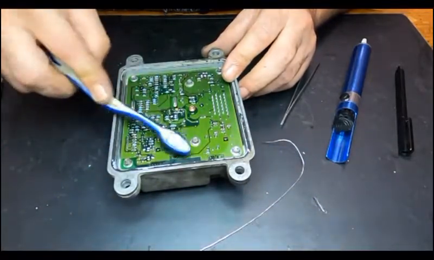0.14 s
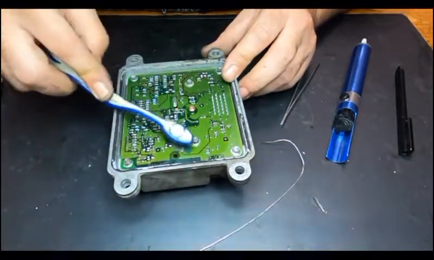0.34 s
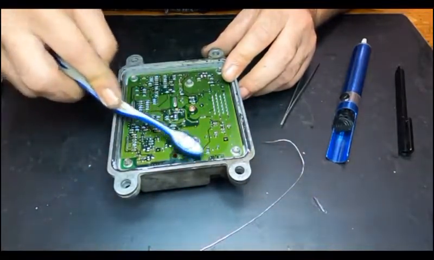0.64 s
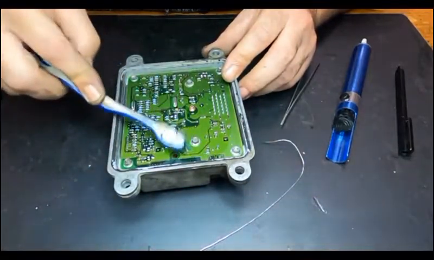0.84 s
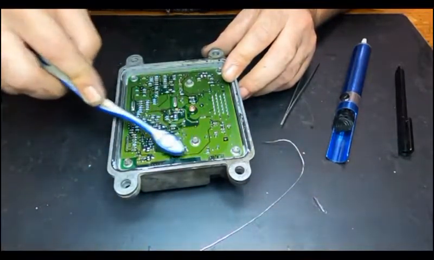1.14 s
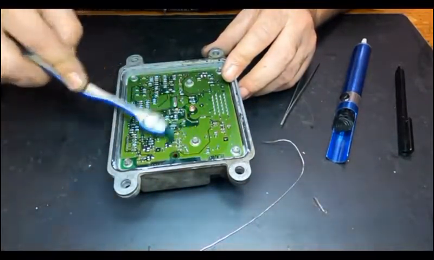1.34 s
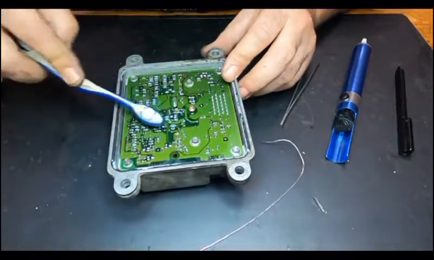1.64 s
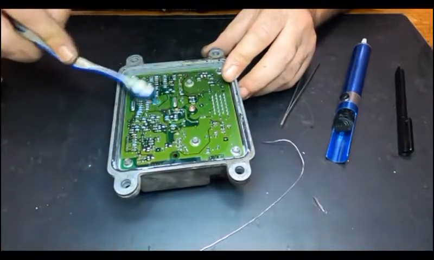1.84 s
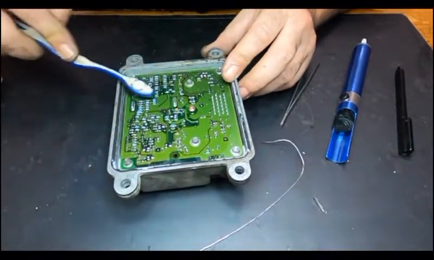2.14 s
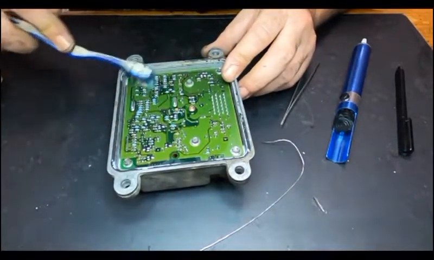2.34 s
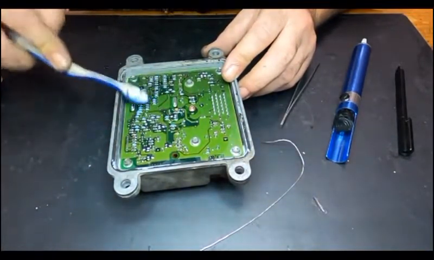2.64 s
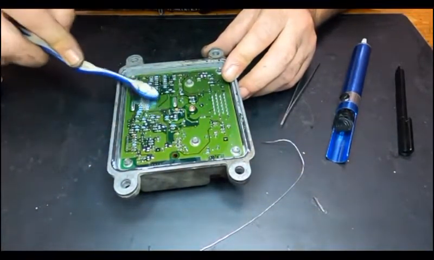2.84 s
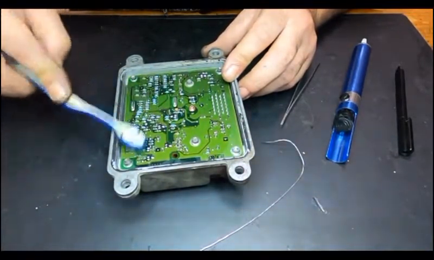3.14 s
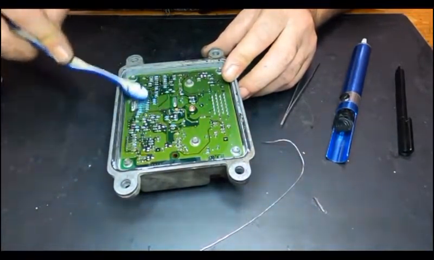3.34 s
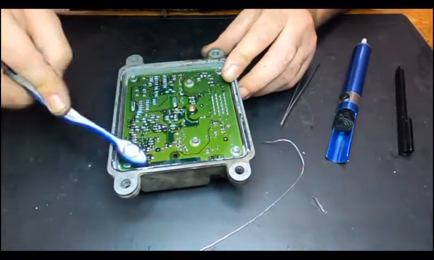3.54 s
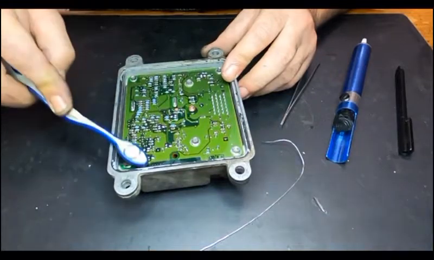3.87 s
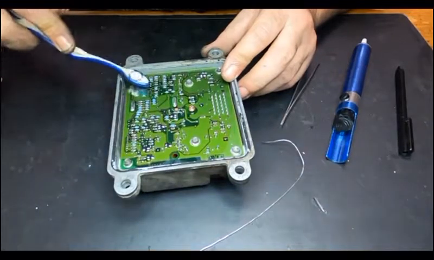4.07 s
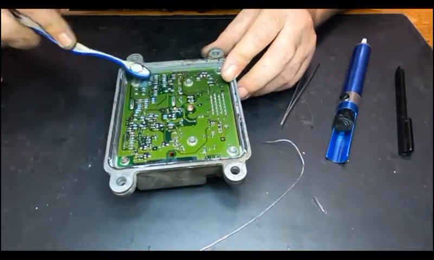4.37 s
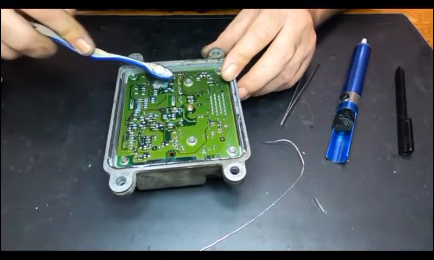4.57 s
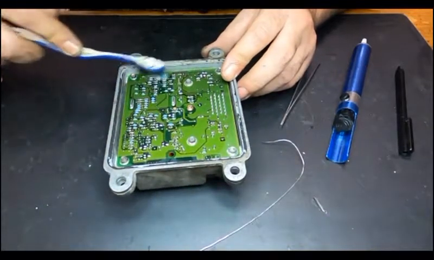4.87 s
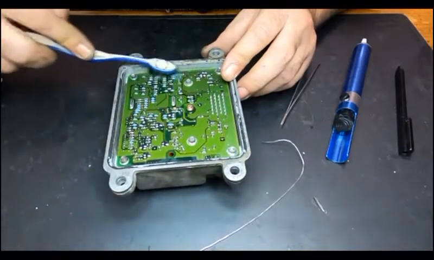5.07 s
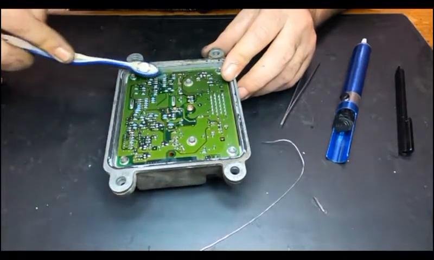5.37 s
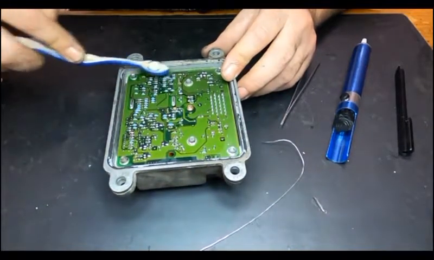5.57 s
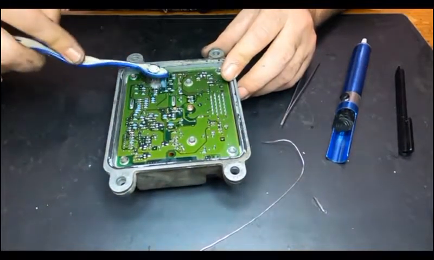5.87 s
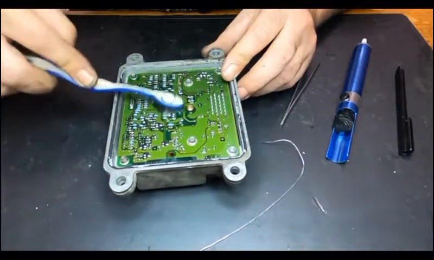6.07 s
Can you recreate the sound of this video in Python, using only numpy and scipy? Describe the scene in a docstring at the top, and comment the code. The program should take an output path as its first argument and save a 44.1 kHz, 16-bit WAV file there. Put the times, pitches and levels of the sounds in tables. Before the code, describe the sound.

A stiff brush scrubs quickly back and forth over a wet circuit board, soft swishes turning into scratchy, pin-plucking rasps above a faint low hum.

```python
"""Toothbrush on a wet circuit board

A toothbrush scrubs a wet board in its metal case, back and forth, on a workbench. Random bristle slips
follow the contact force: a swish on the smooth part, plucked board resonances among the solder pins.
Tufts that snag, bristles that flick and small case knocks are short force volleys.
Drifting sines make the bench drone and mains hum; shaped noise makes the air and the workshop's short tail."""
import sys
import numpy as np
from scipy import signal
from scipy.fft import rfft, irfft, next_fast_len
from scipy.io import wavfile
from scipy.ndimage import uniform_filter1d, map_coordinates

SR = 44100
rng = np.random.default_rng(int(sys.argv[2]) if len(sys.argv) > 2 else 0)


def bounce(signal):
    """Save signal as a 16-bit WAV file at the path given by the first command-line argument."""
    frames = np.transpose(np.atleast_2d(signal))
    limited = np.clip(frames, -1, 1)
    pcm = np.round(limited * 32767).astype(np.int16)
    wavfile.write(sys.argv[1], SR, pcm)


N = 273861
TIME = np.arange(N) / SR

# Brush passes, each until the next turn: (turn [s], crest position [0-1], swish [dB], pin plucking [dB])
STROKES = [(-0.1, 0.03, -47, -49), (0.24, 0.32, -53, -65), (0.38, 1, -54, -85), (0.481, 0.34, -55, -78),
           (0.6, 0.44, -50.5, -58), (0.725, 0.22, -50.5, -56), (0.845, 0.7, -49, -58),
           (0.97, 0.13, -51.5, -54.5), (1.1, 0.3, -50.5, -54.5), (1.34, 0.45, -47, -47.5),
           (1.538, 0.39, -44, -44.5), (1.837, 0.32, -46, -37), (2.077, 0.32, -46.5, -34),
           (2.22, 0.65, -51, -42.5), (2.3, 0.51, -50.5, -34.5), (2.48, 0.62, -49.5, -42),
           (2.577, 0.54, -50, -34), (2.714, 0.37, -46, -41), (2.923, 0.39, -45.5, -41.5),
           (3.058, 0.39, -43.5, -43.5), (3.261, 0.26, -42, -37.5), (3.468, 0.41, -43, -43),
           (3.693, 0.53, -41, -38.5), (3.86, 0.36, -44, -39.5), (4.033, 0.4, -40, -32.5),
           (4.246, 0.37, -49, -42), (4.378, 0.36, -46, -39), (4.568, 0.66, -57.5, -35.5),
           (4.708, 0.44, -48, -32), (4.835, 0.53, -51, -32.5), (4.952, 0.76, -51, -30.5),
           (5.073, 0.41, -54.5, -35), (5.212, .48, -50, -29), (5.318, 0.46, -56.5, -34.5),
           (5.445, 0.39, -49.5, -32), (5.556, 0.5, -53, -32.5), (5.67, 0.48, -48, -32),
           (5.907, 0.5, -49.5, -31), (6.046, 0.39, -48.5, -36.5)]
LAST_TURN_S = 6.18
PIN_LEAD, PIN_EDGE = 0.0068, 0.96  # plucking crest lead [share of a pass]; exponent relative to the swish
FOAM_DB = -70  # faint crackle of the liquid film

# Resonances of each part of the board: (centre [Hz], width [Hz], level relative to the swish [dB])
NEAR_EDGE = [(203.6, 29, -8), (407, 190, -17), (1340, 180, -10)]
SMOOTH_PART = [(406, 155, -21), (1316, 246, -8), (1716, 89, -8), (3780, 460, -5.5)]
MIDDLE = [(402, 210, -23), (1406, 220, -7.5), (6080, 1600, -7.5), (6340, 700, -0.5)]
UPPER_PINS = [(2025, 253, -2.5), (5450, 370, -5.5)]
LEFT_EDGE = [(2750, 890, -1), (4920, 530, -6.5), (11300, 2400, -22)]
TOP_ROW = [(1374, 208, 0), (5500, 370, -10)]
# Way over the board: (arrival [s], resonances of the part, bristle contact past a turn [s], push exponent [-])
ROUTE = [(-.1, NEAR_EDGE, 0.028, 1.12), (.3, SMOOTH_PART, 0.0047, 0.69), (1.17, MIDDLE, 0.03, 1.23),
         (1.65, UPPER_PINS, 0.019, 1.8), (3.05, LEFT_EDGE, 0.0025, 1.68), (4.24, UPPER_PINS, 0.0091, 2.7),
         (4.7, TOP_ROW, 0.0054, 1.8)]

# Board and case, plucked at the pins: (centre [Hz], width [Hz], height above the slope [dB])
PIN_MODES = [(1381, 123, 21.5), (1360, 780, 13), (1880, 191, 29), (2127.6, 189, 26.5), (2730, 280, 6.5),
             (3094, 70, 11.5), (3365, 195, 9.5), (4826, 130, 12), (5363, 106, 22)]
# Board and case, swept lightly: (centre [Hz], width [Hz], height above the slope [dB])
SWEEP_MODES = [(1480, 37, -11), (2480, 37, -19), (3280, 186, 6.5), (3990, 20, 10)]
# Spectral slope under the pin modes: (frequency [Hz], relative level [dB])
PIN_SLOPE = [(200, -35), (750, -26.5), (1000, -21), (1220, -7.5), (1600, -2.5), (2000, 1.5), (2480, 3.5),
             (4000, 3), (6000, -13), (9000, -10), (15000, -53)]
# Spectral slope under the sweep modes: (frequency [Hz], relative level [dB])
SWEEP_SLOPE = [(200, -8.5), (420, -9), (750, -20.5), (1150, -1), (1550, -18.5), (2100, 4.5), (3000, 5),
               (4300, 2.5), (5200, 8), (7500, 1.5), (9000, 2), (12500, -9), (14200, -14), (15600, -48.5)]

# Case knocks under the light passes: (time [s], peak level [dB])
KNOCKS = [(.075, -42), (.098, -39), (.259, -45), (.318, -46), (.341, -43), (.454, -49)]
KNOCK_HZ, KNOCK_RISE_S = 1340, 0.0021
# Wet bristles flicking free: (time [s], relative force [dB])
TICKS = [(0.339, -35.5), (0.849, -36), (1.193, -32), (1.35, -32), (1.4084, -32), (1.486, -33),
         (1.5975, -26), (1.852, -32)]
TICK_RISE_S, TICK_RING_DB = 0.0021, -21  # ring force relative to the tick
# Tufts catching on a pin and letting go: (time [s], relative force [dB])
SNAGS = [(1.681, -17), (1.709, -19.5), (1.882, -21.5), (1.915, -15.5), (1.939, -19.5), (2.0915, -28),
         (2.115, -26.5), (2.244, -14.5), (2.497, -13), (2.5968, -16), (2.7453, -11), (3.076, -22),
         (3.267, -25.5), (3.294, -17), (3.7258, -19.5), (4.9669, -22.5), (5.031, -11.5), (5.149, -15),
         (5.243, -17), (5.9648, -14), (5.998, -15), (6.0915, -18.5)]
SNAG_RISE_S, SNAG_TICK_DB = 0.003073, -25  # bright part relative to the ring, before each path's gain
DRAG_S, DRAG_DB = 0.012, -13.5  # drag swell before release; force relative to the volley

# Mains hum and resting drone: (time [s], level [dB])
HUM_CURVE = [(0.05, -53), (1.07, -48.5), (1.44, -53.5), (1.8, -49.5), (2.46, -61), (2.8, -52),
             (3.36, -57.5), (4.08, -49), (4.38, -56), (5.03, -49), (5.38, -63), (6.15, -50)]
DRONE_DB, HUM_DB, THIRD_DB = -0.5, -0.5, -75  # first two relative to HUM_CURVE
# Swells of the bench's low resonance: (crest [s], level [dB])
SWELLS = [(.12, -42), (.35, -47), (.67, -48), (1.09, -39), (2.809, -40), (3.63, -52.5), (3.95, -45.5),
          (4.53, -45.5), (4.929, -39), (5.18, -45.5), (5.67, -47.5)]
SWELL_RISE_S, SWELL_FALL_S = 0.037, 0.068
# Spectral slope of the bench bump: (frequency [Hz], relative level [dB])
BUMP_SLOPE = [(20, -5), (55, 0), (130, 5), (280, -4), (450, -24), (1000, -84)]
# Bench resonance in the bump: (centre [Hz], width [Hz], height above the slope [dB])
BUMP_MODES = [(45, 25, 2)]
BUMP_S, BUMP_DB, BUMP_CONTACT_S = 1.044, -28, 0.0058

# Workshop air spectrum: (frequency [Hz], relative level [dB])
ROOM_AIR = [(20, 2), (32, -6), (42, -21), (53, 6.5), (65, -16), (85, 7.5), (140, -5), (205, -3.5),
            (260, -13.5), (450, -24.5), (700, -29), (2000, -19.5), (8000, -31.5), (15000, -42)]
# Workshop decay: (frequency [Hz], t60 [s])
WORKSHOP_T60 = [(200, 0.4), (2000, 0.11), (12000, 0.094)]
# Left-right likeness: (frequency [Hz], likeness [0-1])
ALIKE = [(100, 0.92), (300, 0.51), (700, 0.58), (1400, 0.8), (2000, 0.99), (3100, 0.79), (5500, 0.42),
         (8000, 0.09), (15000, .4)]
# Left trailing right: (frequency [Hz], phase [rad])
LAG = [(300, 0.13), (1500, 0.8), (2000, 0.5), (4000, 0.6), (6000, 0.26), (9000, 0.64), (14000, 0.7)]
# Microphone colour: (frequency [Hz], left minus right [dB])
LEAN = [(110, 2), (200, -0.5), (380, -3.5), (700, 1), (1300, -2.5), (1900, 3.5), (4400, 0.5), (5600, 3),
        (8000, -.5), (15000, -2.5)]
TOP_HZ = 15830


def amp(db):
    """Decibels to gain."""
    return 10 ** (np.asarray(db) / 20)


def unit(x):
    """Scale to rms 1."""
    return x / np.sqrt(np.mean(x ** 2) + 1e-20)


def along(points, hz):
    """Interpolate (frequency [Hz], value) points on a log axis."""
    f, v = np.transpose(points)
    return np.interp(np.log(hz + 1), np.log(f + 1), v)


def wobble(rate_hz):
    """Smooth random curve with rate_hz knots a second."""
    knots = rng.standard_normal(4096)
    return map_coordinates(knots, [TIME * rate_hz], mode="wrap")


def filtered(x, response):
    """Apply a complex response of frequency."""
    size = next_fast_len(N + SR // 2)
    spectrum = rfft(x, size) * response(np.fft.rfftfreq(size, 1 / SR))
    return irfft(spectrum, size)[..., :N]


def body(slope, modes, size=4096):
    """Minimum-phase impulse response, energy 1, of resonances standing on a slope."""
    hz = np.fft.rfftfreq(size, 1 / SR)
    peaks = sum((amp(db) - 1) / (1 + 2 * ((hz - centre) / width) ** 2) ** 2
                for centre, width, db in modes)
    magnitude = amp(along(slope, hz)) * (1 + peaks)
    # folding the cepstrum makes the response causal
    cepstrum = irfft(np.log(np.maximum(magnitude, 1e-6)))
    cepstrum[1:size // 2] *= 2
    cepstrum[size // 2 + 1:] = 0
    ring = irfft(np.exp(rfft(cepstrum)))
    return ring / np.linalg.norm(ring)


def rung(pair, ring):
    """Play two force signals through an impulse response."""
    return signal.fftconvolve(pair, ring[None], axes=1)[:, :pair.shape[1]]


def spread(pair):
    """Mix two unrelated signals into left and right with the likeness of ALIKE."""
    def mid_side_gains(hz):
        angle = np.arccos(np.clip(along(ALIKE, hz), 0, 1)) / 2
        return np.array([np.ones_like(hz), np.tan(angle)])
    mid, side = filtered(pair, mid_side_gains)
    return np.array([mid + side, mid - side])


def tone(hz, wander_rad):
    """Sine of rms 1 with drifting phase."""
    return np.sqrt(2) * np.sin(2 * np.pi * hz * TIME + wander_rad * wobble(12))


def air(db):
    """Faint steady workshop hiss over a slightly uneven rumble."""
    noise = unit(filtered(rng.standard_normal((2, N)), lambda hz: amp(along(ROOM_AIR, hz))))
    rumble = filtered(noise, lambda hz: 1 / (1 + (hz / 280) ** 4))
    lumps = amp(2.8 * wobble(10) + wobble(3))
    return amp(db) * spread(noise - rumble + rumble * lumps)


def bench_drone():
    """Low bench resonance: a wavering tone with a resting level and separate swells."""
    waver = amp(1.8 * wobble(20)) * tone(hz=122.5, wander_rad=0.6)
    resting = amp(np.interp(TIME, *np.transpose(HUM_CURVE)) + DRONE_DB)
    swells = np.zeros(N)
    for crest_s, db in SWELLS:
        width_s = np.where(TIME < crest_s, SWELL_RISE_S, SWELL_FALL_S)
        swells += amp(db) * np.exp(-((TIME - crest_s) / width_s) ** 2)
    return (resting + swells) * waver


def mains_hum():
    """Mains hum of varying level with a steady third harmonic."""
    level = amp(np.interp(TIME, *np.transpose(HUM_CURVE)) + HUM_DB)
    return level * tone(hz=100, wander_rad=0.2) + amp(THIRD_DB) * tone(hz=300, wander_rad=0.4)


def flicks(per_second, scatter_db):
    """Single bristles slipping at random moments with random force; rms 1."""
    slips = rng.random(N) < per_second / SR
    size_db = scatter_db * np.clip(rng.standard_normal(N), -2, 2)
    return unit(slips * amp(size_db) * rng.choice([-1, 1], (2, N)))


def push(start, end, crest, sharpness):
    """Contact force over one pass: least at the turns, most at the crest."""
    top = start + np.clip(crest, 0.1, 0.9) * (end - start)
    force = np.zeros(N)
    inside = slice(max(int(start * SR), 0), int(end * SR))
    phase = np.interp(TIME[inside], [start, top, end], [0, 0.5, 1])
    force[inside] = np.abs(np.sin(np.pi * phase)) ** sharpness
    return force


def strokes():
    """Forces of the sweeping bristles and of those that pluck the pins."""
    sweep_power, pluck_power = np.zeros(N), np.zeros(N)
    ends = [row[0] for row in STROKES[1:]] + [LAST_TURN_S]
    for (start, crest, swish_db, pin_db), end in zip(STROKES, ends):
        _, _, flex, sharpness = [leg for leg in ROUTE if leg[0] < (start + end) / 2][-1]
        sweep_push = push(start - flex, end + flex, crest, sharpness)
        pluck_push = push(start - flex, end + flex, crest - PIN_LEAD, PIN_EDGE * sharpness)
        sweep_power += (amp(swish_db) * sweep_push) ** 2
        pluck_power += (amp(pin_db) * pluck_push) ** 2
    # tufts pass the solder in clumps, so both forces stutter together
    clumps = wobble(130) + 0.5 * wobble(40)
    # many soft slips plus a few wet bristles ticking on their own
    bristles = flicks(per_second=11000, scatter_db=4) + amp(-7.5) * flicks(per_second=140, scatter_db=4)
    foam = amp(FOAM_DB) * flicks(per_second=48, scatter_db=4)
    sweep = np.sqrt(sweep_power) * amp(-1 + 1.95 * clumps) * bristles + foam
    pluck = np.sqrt(pluck_power) * amp(-1 + 1.37 * clumps) * flicks(per_second=1300, scatter_db=2)
    return sweep, pluck


def roaming(pair, slope, modes, wander_db):
    """Ring the board while the brush favours one mode and then another."""
    hz, t, z = signal.stft(rung(pair, body(slope, modes)), SR, nperseg=1024)
    favour = unit(uniform_filter1d(rng.standard_normal((len(modes), len(t))), size=6, axis=1))
    near = np.array([np.exp(-((hz - centre) / width) ** 2) for centre, width, _ in modes])
    return signal.istft(z * amp(wander_db * near.T @ favour), SR, nperseg=1024)[1][:, :N]


def spots(sweep, fade_s):
    """Resonances of each part of the board, flickering while the bristles cross it."""
    out = np.zeros((2, N))
    t = np.arange(SR // 8) / SR
    contact = sweep * rng.choice([-1, 1], (2, N)) * amp(3 * wobble(45) - 1)
    departures = [leg[0] for leg in ROUTE[1:]] + [N / SR]
    for (start, modes, _, _), end in zip(ROUTE, departures):
        touch = np.clip(np.minimum(TIME - start, end - TIME) / fade_s + 0.5, 0, 1)
        near = slice(max(int((start - fade_s) * SR), 0), int((end + 2 * fade_s) * SR) + len(t))
        for centre, width, db in modes:
            # the wider the resonance, the faster its ring swells and dies
            ring = np.exp(-(2 * width * t - 2) ** 2 * 2) * np.sin(2 * np.pi * centre * t)
            ring /= np.linalg.norm(ring)
            out[:, near] += amp(db) * rung(contact[:, near] * touch[near], ring)
    return out


def brush():
    """Bristle forces ring the board; the left side trails the right in phase."""
    sweep, pluck = strokes()
    tick, ring = ticks_and_snags(ring_db=-12, tick_db=-7)
    swish = roaming(sweep + tick, SWEEP_SLOPE, SWEEP_MODES, wander_db=5)
    swish = swish + spots(sweep + tick, fade_s=0.0066)
    scrape = roaming(pluck + ring, PIN_SLOPE, PIN_MODES, wander_db=2)
    left, right = spread(swish + scrape)
    return np.array([filtered(left, lambda hz: np.exp(-1j * along(LAG, hz))), right])


def room(x):
    """The walls answer with a short decaying tail, different at each microphone."""
    hz, t, z = signal.stft(rng.standard_normal((2, SR // 3)), SR, nperseg=256)
    decay = amp(-60 * t / along(WORKSHOP_T60, hz)[:, None])
    tail = signal.istft(z * decay, SR, nperseg=256)[1]
    delayed = np.pad(tail, ((0, 0), (200, 0)))  # samples
    return signal.fftconvolve(x, delayed / np.linalg.norm(tail[0]), axes=1)[:, :N]


def volleys(events, rise_s):
    """Force of bristles letting go together: a swell over rise_s and a slower fall."""
    force = np.zeros(N + SR)
    t = np.arange(SR // 10) / SR
    for s, db in events:
        force[int(s * SR):][:len(t)] += amp(db) * t / rise_s * np.exp(1 - t / rise_s)
    return force[:N]


def knocks():
    """Small hollow knocks: each rings a low mode of the case for a few milliseconds."""
    ring = np.sin(2 * np.pi * KNOCK_HZ * TIME + 0.42 * wobble(300))
    return volleys(KNOCKS, KNOCK_RISE_S) * ring


def ticks_and_snags(ring_db, tick_db):
    """Ticks are mostly bright slips; snags drag, then ring the board with one main snap each."""
    flicked = volleys(TICKS, TICK_RISE_S)
    drag = volleys([(s - DRAG_S, db + DRAG_DB) for s, db in SNAGS], DRAG_S)
    caught = volleys(SNAGS, SNAG_RISE_S) + drag
    ring_force = amp(ring_db) * (caught + amp(TICK_RING_DB) * flicked)
    plucks = ring_force * flicks(per_second=2200, scatter_db=0)
    for s, db in SNAGS:
        plucks[0, int((s + SNAG_RISE_S) * SR)] += amp(db)  # mid only: one point of contact
    tick_force = amp(tick_db) * (flicked + amp(SNAG_TICK_DB) * caught)
    return tick_force * flicks(per_second=6800, scatter_db=2), plucks


def bench_bump():
    """One soft bump: a smooth force pulse rings the bench."""
    pulse = np.hanning(int(BUMP_CONTACT_S * SR))
    thud = np.convolve(body(BUMP_SLOPE, BUMP_MODES, size=8192), pulse)
    bump = np.zeros(N)
    bump[int(BUMP_S * SR):][:len(thud)] = amp(BUMP_DB) * thud / np.abs(thud).max()
    return bump


def scene():
    """Scrubbing, its echo, the bench and the air."""
    scrub = brush() + knocks()
    echo = amp(-16) * room(scrub)
    bench = bench_drone() + mains_hum() + bench_bump()
    return scrub + echo + bench + air(db=-55)


def record(dry):
    """Give each microphone its colour and remove everything from TOP_HZ up."""
    sides = np.array([[0.5], [-0.5]])
    return filtered(dry, lambda hz: amp(sides * along(LEAN, hz)) * (hz < TOP_HZ))


dry = scene()
out = record(dry)
bounce(out)
```